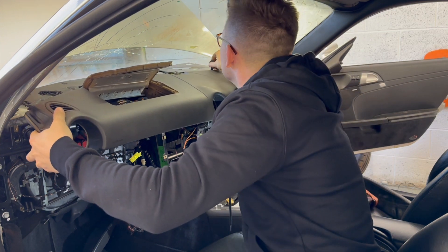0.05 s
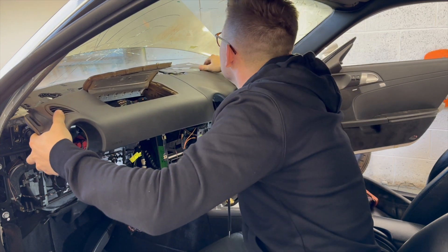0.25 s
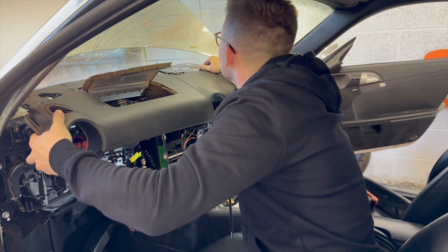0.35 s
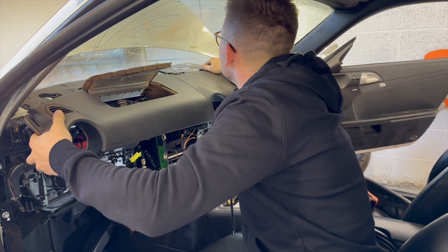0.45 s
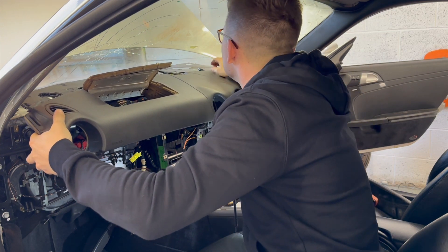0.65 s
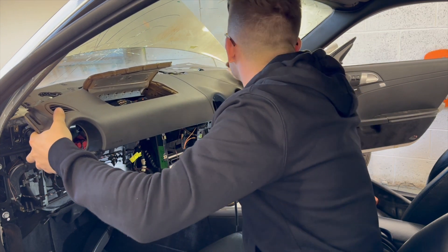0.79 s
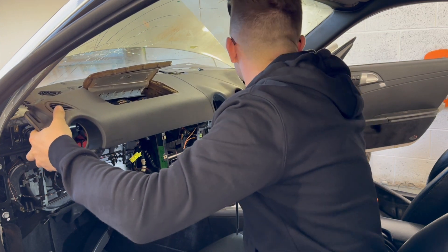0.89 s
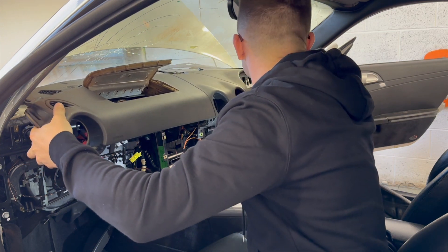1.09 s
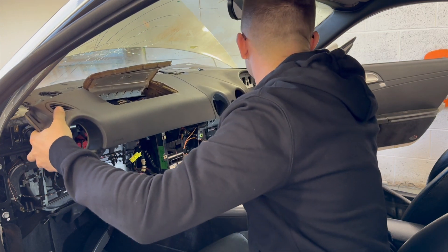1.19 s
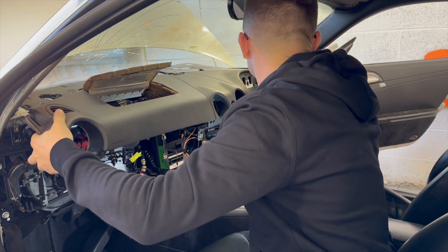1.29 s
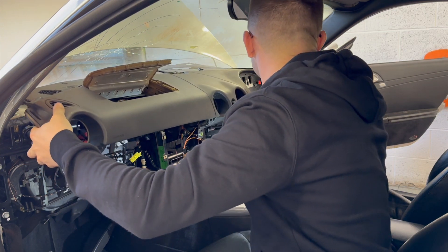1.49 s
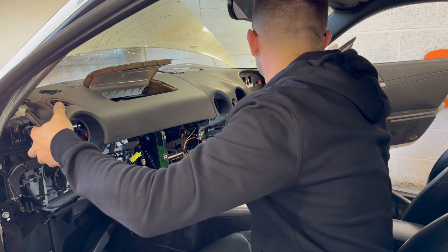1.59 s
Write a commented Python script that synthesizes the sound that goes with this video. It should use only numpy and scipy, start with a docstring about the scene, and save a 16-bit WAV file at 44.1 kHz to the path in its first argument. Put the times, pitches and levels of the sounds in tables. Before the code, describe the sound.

A plastic dashboard is tugged on its clips: a fading knock, a light tick, a hard rebounding clack with a bright snap, then soft hand slides and faint ticks, close in a small car cabin with low hum.

```python
"""A plastic dashboard is tugged against its mounting clips inside a car, over a steady low hum and soft air. At
first a knock is already dying away as a hand slides over the panel. Then come one light knock, a hard knock
that rebounds and a bright snap as a clip lets go. More slides and small ticks of the trim follow. Knocks are
bursts of filtered noise with a short cabin tail, plus ringing sine waves for panel and clip; the trim's ticks
are the noise and tail alone, slides are grainy noise, and the hum is a few sine waves."""
import sys
import numpy as np
from scipy import signal
from scipy.fft import rfft, irfft
from scipy.io import wavfile
from scipy.ndimage import uniform_filter1d

SR = 44100
rng = np.random.default_rng(int(sys.argv[2]) if len(sys.argv) > 2 else 0)


def dump(signal):
    """Clip the signal to [-1, 1] and save it as 16-bit WAV at the path in sys.argv[1]."""
    limited = np.clip(np.atleast_2d(signal).T, -1, 1)
    pcm = np.round(limited * 32767).astype(np.int16)
    wavfile.write(sys.argv[1], SR, pcm)


N = 72765  # length in samples, 1.65 s


def undb(db):
    """Turn dB into an amplitude factor."""
    return 10 ** (np.asarray(db) / 20)


def bins():
    """Frequencies of the filter grid in Hz, with zero replaced by 1 so that logarithms work."""
    return np.maximum(np.fft.rfftfreq(2 * N, 1 / SR), 1)


def curve(points):
    """Gain through (Hz, dB) points, scaled to keep the power of white noise."""
    hz, db = np.array(points).T
    gain = undb(np.interp(np.log(bins()), np.log(hz), db))
    return gain / np.sqrt(np.mean(gain ** 2))


def above(hz):
    """Smooth step from 0 to 1 around a frequency."""
    return 1 / (1 + (hz / bins()) ** 4)


def colour(x, gain):
    """Filter with the given gain that never sounds before its input (minimum phase)."""
    cepstrum = irfft(np.log(gain + 1e-9))
    # fold the backward half onto the forward half
    cepstrum[1:N] *= 2
    cepstrum[N + 1:] = 0
    response = np.exp(rfft(cepstrum))
    return irfft(rfft(x, 2 * N) * response)[:N]


def walk(rate):
    """Random levels held for 1 / rate seconds, smoothed twice and scaled to a spread of 1."""
    hold = max(int(SR / rate), 1)
    steps = np.repeat(rng.standard_normal(N // hold + 1), hold)
    smooth = uniform_filter1d(uniform_filter1d(steps, hold), hold)[:N]
    return smooth / smooth.std()


def burst(start, attack, t60):
    """Envelope that rises quickly, while its decay falls by 60 dB every t60 seconds."""
    age = np.maximum(np.arange(N) / SR - start, 0)
    rise = 1 - np.exp(-(age / attack) ** 2)
    return rise * np.exp(-np.log(1000) * age / t60)


# The steady hum. Each row: frequency in Hz, average (rms) level in dB.
HUM_LINES = [(99.7, -45.5), (218.8, -61), (60.7, -64), (400.4, -82), (779, -77)]
# Tone of the background air. Each row: frequency in Hz, relative level in dB per Hz.
AIR_SPECTRUM = [(25, -32.5), (45, -11.5), (65, -0.5), (100, -0.5), (165, -1.5), (260, -11.5), (420, -14),
                (600, -18), (850, -19), (1600, -26), (4000, -32.5), (9000, -41), (11000, -55), (16000, -69)]
AIR_DB = -56.5
HUM_WAVER_DB, HUM_WAVER_PER_S = 0.25, 9.2


def background():
    """Slightly wavering sine waves make the hum, and filtered noise makes the soft air."""
    t = np.arange(N) / SR
    hum = 0
    for hz, db in HUM_LINES:
        level = undb(db + HUM_WAVER_DB * walk(HUM_WAVER_PER_S))
        # sqrt(2) turns an rms level into a sine's peak; each line starts at a random phase
        hum = hum + np.sqrt(2) * level * np.sin(2 * np.pi * (hz * t + rng.random()))
    air = colour(rng.standard_normal(N), curve(AIR_SPECTRUM))
    return hum + undb(AIR_DB) * air


# Tone of skin rubbing on the panel. Each row: frequency in Hz, relative level in dB per Hz.
SLIDE_SPECTRUM = [(400, 1.5), (1300, 3), (3500, 4.5), (7000, -1.5), (11000, -9.5), (16000, -14.5)]
# The hand's slides. Each row: start, peak and end in seconds, level in dB, extra treble in dB.
# A start below zero is before the sound begins; a peak after the end means it cuts off while rising.
SLIDE_STROKES = [(-0.1, 0.0, 0.2, -66, -10), (0.193, 0.234, 0.26, -55, 1.5), (0.368, 0.665, 0.79, -69, 9.5),
                 (0.78, 0.894, 1.065, -64, -7.5), (1.467, 1.49, 1.487, -60, -14),
                 (1.56, 1.59, 1.62, -74, 9)]
GRAIN_DB, GRAIN_PER_S, SLIDE_TREBLE_HZ = 1, 200, 6300


def hand():
    """Friction makes a grainy hiss that swells and stops with each slide."""
    t = np.arange(N) / SR
    out = 0
    for start, peak, end, db, treble_db in SLIDE_STROKES:
        grains = rng.standard_normal(N) * undb(GRAIN_DB * walk(GRAIN_PER_S))
        swell = np.interp(t, [start, peak, end], [0, 1, 0])
        tone = undb(treble_db * above(SLIDE_TREBLE_HZ))
        out = out + undb(db) * colour(grains * swell, curve(SLIDE_SPECTRUM) * tone)
    return out


BASS_HZ, TREBLE_HZ, TOP_OCTAVE_HZ = 970, 3970, 10800  # where the tone controls turn over
CRACK_ATTACK_S, CRACK_T60_S = 0.00055, 0.037
CABIN_DB, CABIN_BUILD_S, CABIN_SPLIT_HZ = -14.5, 0.002, 4100  # level is relative to the direct crack
CABIN_T60_S, CABIN_TOP_T60_S = 0.28, 0.17  # below and above the split


def crack(start, spectrum, bass_db, treble_db, top_db):
    """Dense, quickly damped vibration of the plastic and its tail in the cabin, where treble dies sooner."""
    direct, low, high = rng.standard_normal((3, N))
    low_pass = signal.butter(2, CABIN_SPLIT_HZ, fs=SR)
    high_pass = signal.butter(2, CABIN_SPLIT_HZ, "high", fs=SR)
    low_tail = signal.lfilter(*low_pass, low) * burst(start, CABIN_BUILD_S, CABIN_T60_S)
    high_tail = signal.lfilter(*high_pass, high) * burst(start, CABIN_BUILD_S, CABIN_TOP_T60_S)
    hit = direct * burst(start, CRACK_ATTACK_S, CRACK_T60_S)
    tone_db = bass_db * (1 - above(BASS_HZ)) + treble_db * above(TREBLE_HZ) + top_db * above(TOP_OCTAVE_HZ)
    return colour(hit + undb(CABIN_DB) * (low_tail + high_tail), curve(spectrum) * undb(tone_db))


# Crack of the small trim parts. Each row: frequency in Hz, relative level in dB per Hz.
TICK_SPECTRUM = [(200, -20.5), (600, -3), (1200, 0), (2100, -5), (3500, 2), (4500, -7.5), (6000, -11),
                 (9000, -10), (11000, -29.5), (16000, -29.5)]
# Faint ticks of the settling trim. Each row: start in seconds, level in dB, extra treble in dB,
# extra top octave in dB.
TRIM_TICKS = [(0.001, -46, -6.5, -3), (0.699, -50, -1.5, 13), (0.8812, -58, 6, 11), (0.896, -54, 0, 10),
              (0.912, -70, -2, 0), (0.9373, -46.5, 2, -23), (0.9415, -51, -5, 6), (0.953, -49, -11, 4),
              (1.18, -58, -1, 5), (1.3933, -63.5, 7, 0), (1.4774, -60, 1, -10), (1.487, -65, -7, -11)]


def trim():
    """Light ticks that only crack, too weak to ring the panel."""
    out = 0
    for start, db, treble_db, top_db in TRIM_TICKS:
        out = out + undb(db) * crack(start, TICK_SPECTRUM, 0, treble_db, top_db)
    return out


def ring(start, modes, attack):
    """A part rings at its own pitches after one knock, each fading at its own speed."""
    age = np.arange(N) / SR - start
    out = 0
    for hz, db, t60 in modes:
        out = out + undb(db) * np.sin(2 * np.pi * hz * age) * burst(start, attack, t60)
    return out


# Dense crack of the plastic. Each row: frequency in Hz, relative level in dB per Hz.
CRACK_SPECTRUM = [(120, -53), (250, -3), (450, -11), (650, -11.5), (1000, -0.5), (2000, 0), (3000, -8.5),
                  (4300, -8), (5800, -15.5), (8800, -16), (10500, -29.5), (13000, -38), (15800, -37)]
# Ringing of the panel. Each row: frequency in Hz, relative level in dB, time to fade by 60 dB in seconds.
PANEL_MODES = [(286, -35, 0.25), (385.3, -28, 0.25), (432.4, -31, 0.3), (546, -34.5, 0.23),
               (787, -26.5, 0.25), (942, -26.5, 0.18), (1222, -22, 0.15), (1231, -28, 0.083),
               (1355, -25.5, 0.19), (1580, -17, 0.095), (1720, -4, 0.024), (1928, -17, 0.11),
               (2028, 6.5, .014), (2172, -21, 0.085), (2565, -16, 0.063), (4365, -8.5, 0.017)]
# Ringing of a mounting clip. Each row: frequency in Hz, relative level in dB, time to fade by 60 dB in seconds.
MOUNT_MODES = [(1663, -14.5, 0.15), (2120, -2.5, 0.039), (2320, -13, 0.031), (2855, -10, 0.063),
               (3216, -10.5, 0.055), (3830, -13, 0.12), (4740, -9, 0.044), (5280, -17.5, 0.077),
               (6050, -15.5, 0.045), (8070, -13, 0.029), (9350, -7, 0.015)]
# Clips knocking on the panel. Each row: start in seconds (below zero: before the sound begins),
# level in dB, extra bass, treble and top octave of the crack in dB, panel ring in dB, clip ring in dB.
# Both rings are relative to the level of their knock.
CLIP_KNOCKS = [(-0.03, -37.5, 15.5, 17.5, -14, -0.5, 11.5), (0.2245, -32.5, -24, 3.5, -5, -28, 3),
               (0.2644, -28, -0.5, -2, 5, 14.5, -2), (0.2740, -30.5, 6.5, -11, -5, 8, -14),
               (0.2785, -35.5, 3, -41, -14, 7.5, -18), (0.2843, -34.5, 6, -7, 7, 14, -5),
               (0.2875, -34, 8, 12, 12.5, -18, -9), (0.2896, -34, 5, 11, 2, -12, -5.5),
               (0.2919, -32, 12, 5.5, 5, 0, -6.5), (0.308, -44, 14, -8, 0, 6, -16),
               (0.325, -48, 4.5, 1, -2, 4, -12)]
PANEL_ATTACK_S, CLIP_ATTACK_S = 0.0014, 0.00079


def clips():
    out = 0
    for start, db, bass_db, treble_db, top_db, panel_db, clip_db in CLIP_KNOCKS:
        knock = crack(start, CRACK_SPECTRUM, bass_db, treble_db, top_db)
        panel = undb(panel_db) * ring(start, PANEL_MODES, PANEL_ATTACK_S)
        clip = undb(clip_db) * ring(start, MOUNT_MODES, CLIP_ATTACK_S)
        out = out + undb(db) * (knock + panel + clip)
    return out


def scene():
    """Add all the sources into one channel."""
    return (background() + hand() + trim() + clips())[None]


CUT_HZ = 16200


def record(dry):
    """The recorder cuts the top with a steep low-pass filter."""
    # order 10, 0.2 dB ripple below the cut, 80 dB down above it
    low_pass = signal.ellip(10, 0.2, 80, CUT_HZ, fs=SR, output="sos")
    return signal.sosfilt(low_pass, dry)


dry = scene()
out = record(dry)
dump(out)
```